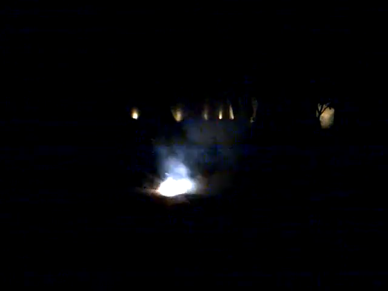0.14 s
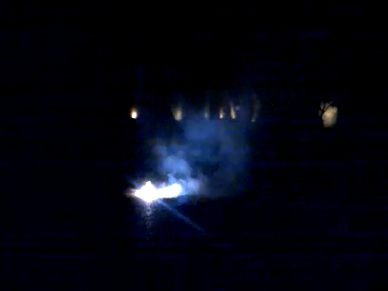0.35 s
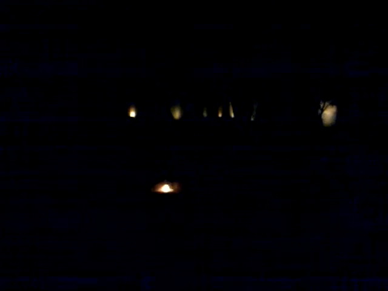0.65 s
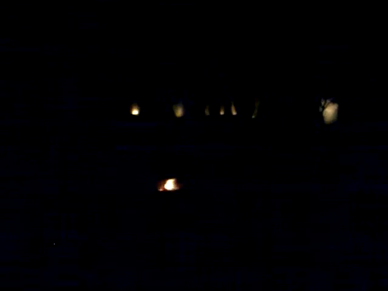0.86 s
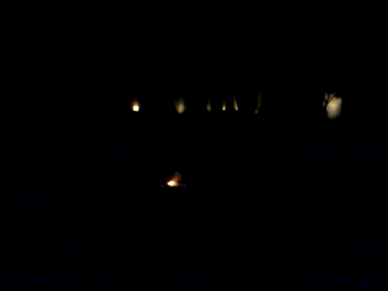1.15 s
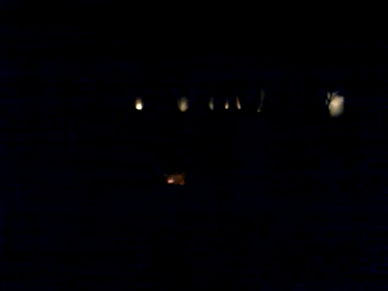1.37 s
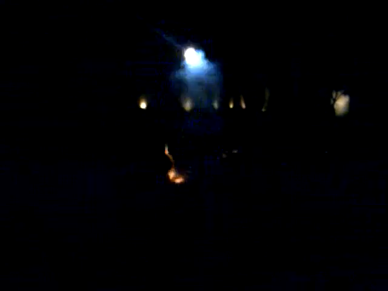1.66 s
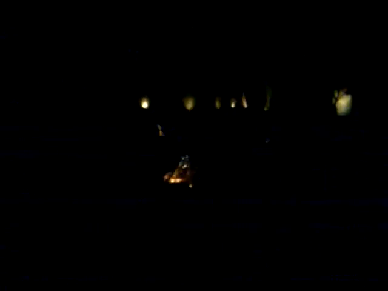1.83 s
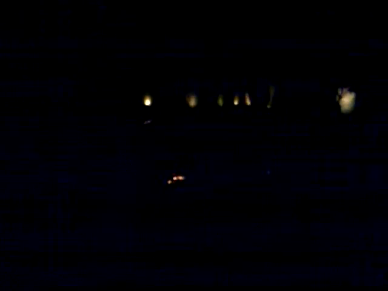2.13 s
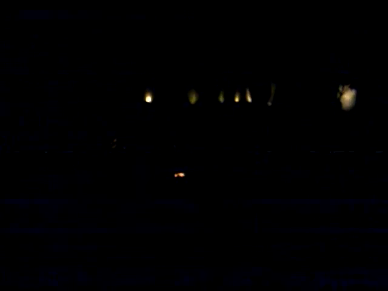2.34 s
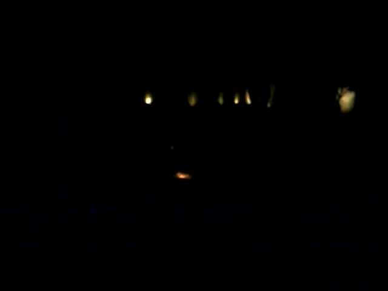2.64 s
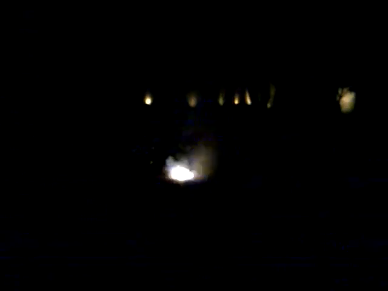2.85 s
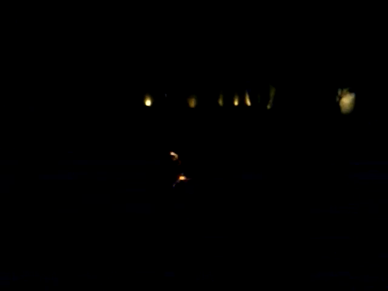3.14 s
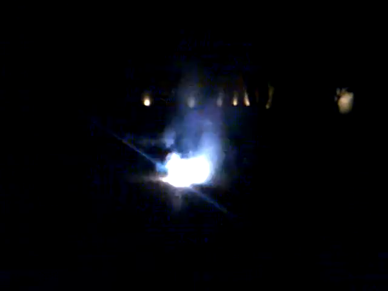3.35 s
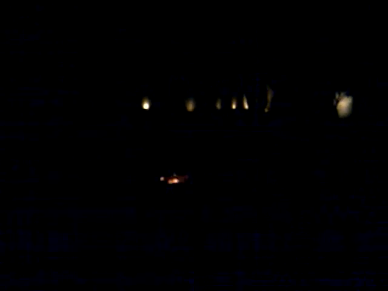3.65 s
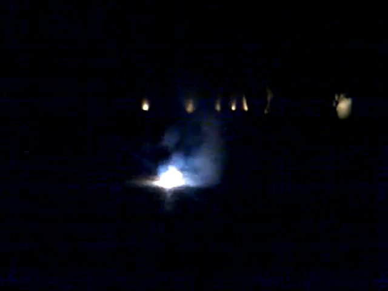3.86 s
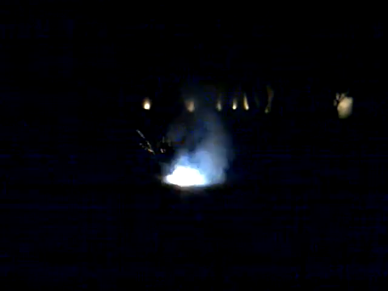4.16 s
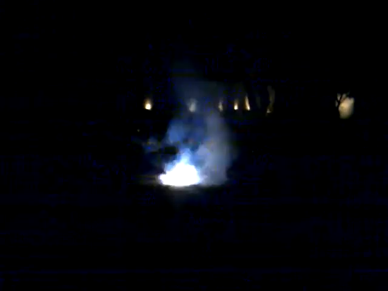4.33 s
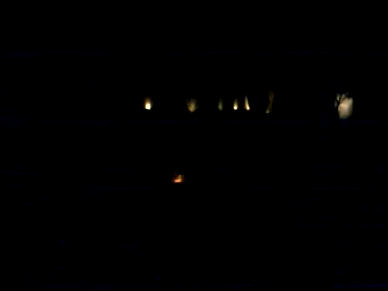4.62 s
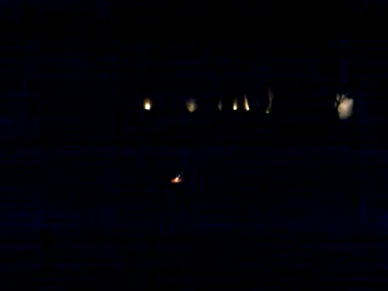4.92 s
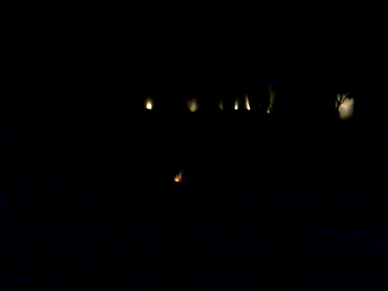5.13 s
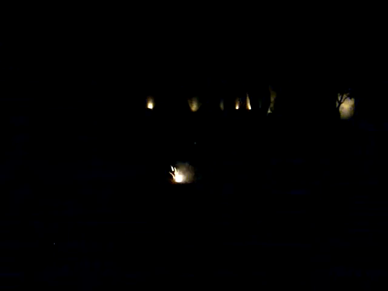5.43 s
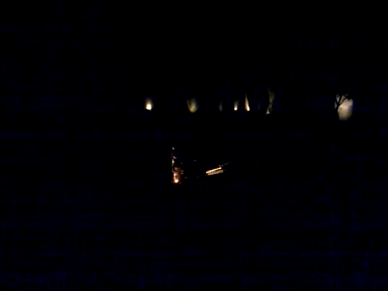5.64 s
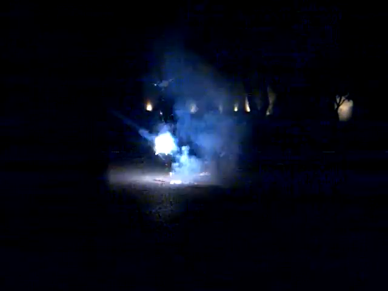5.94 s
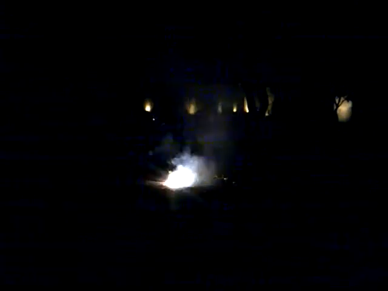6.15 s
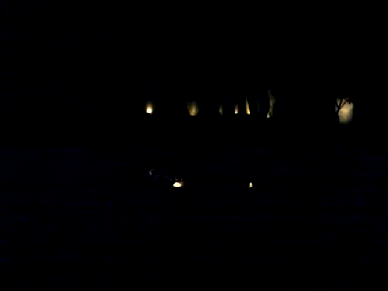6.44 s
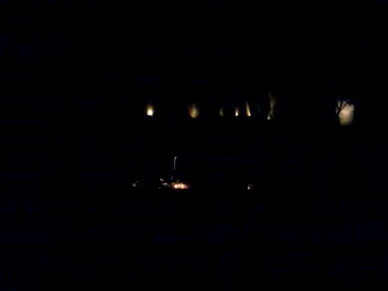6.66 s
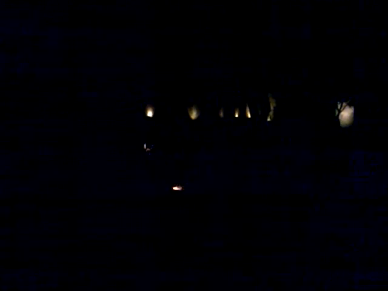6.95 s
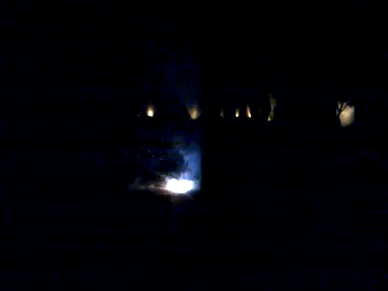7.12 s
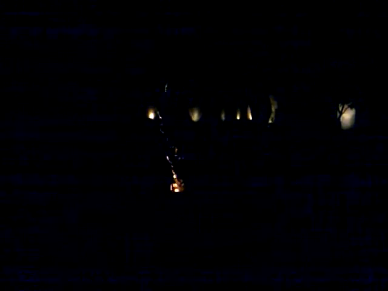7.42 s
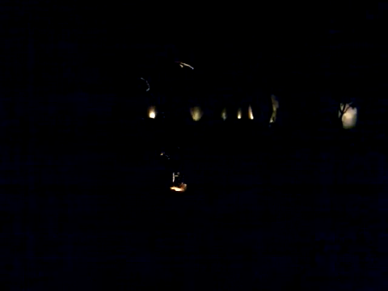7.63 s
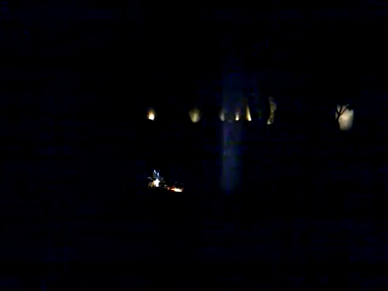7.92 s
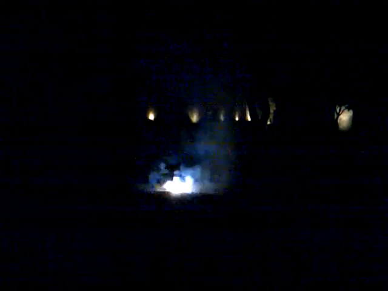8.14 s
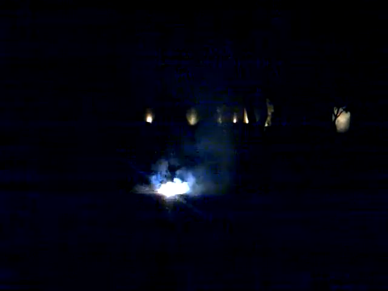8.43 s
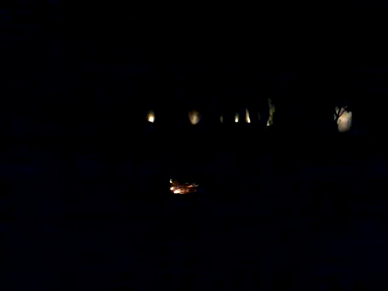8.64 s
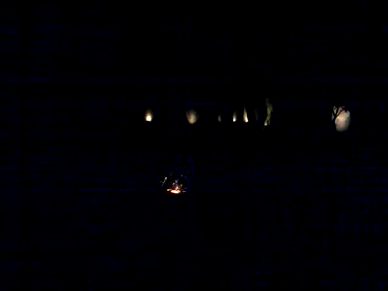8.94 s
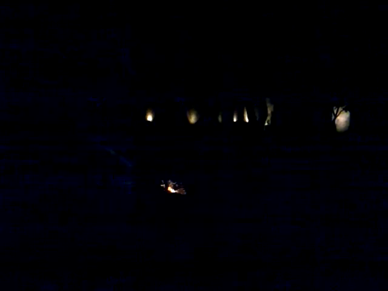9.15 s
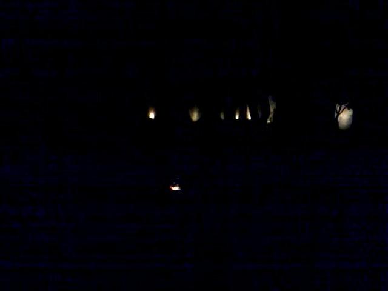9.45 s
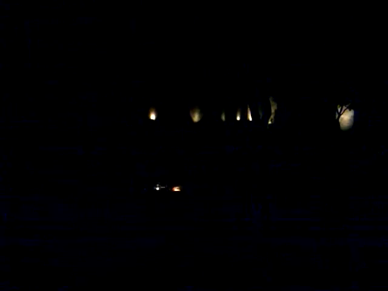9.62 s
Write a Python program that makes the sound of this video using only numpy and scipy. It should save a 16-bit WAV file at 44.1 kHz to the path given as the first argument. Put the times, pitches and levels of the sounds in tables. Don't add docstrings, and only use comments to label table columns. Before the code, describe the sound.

Dense, uneven firecracker bangs crack close by outdoors, distorting the small microphone, while house fronts throw back rough, pumping echoes without a pause

```python
import sys
import numpy as np
from scipy import signal
from scipy.fft import rfft, irfft, next_fast_len
from scipy.io import wavfile
from scipy.ndimage import uniform_filter1d

SR = 44100
rng = np.random.default_rng(int(sys.argv[2]) if len(sys.argv) > 2 else 0)


def gain_from_db(level_db):
    decades = np.asarray(level_db, float) / 20
    return 10 ** decades


def dump_mix(stems):
    frames = np.atleast_2d(stems).T
    limited = np.clip(frames, -1, 1)
    pcm = np.round(limited * 32767).astype(np.int16)
    wavfile.write(sys.argv[1], SR, pcm)


N = 431298
LEAD = SR // 4

# t/s, peak level/dB, treble level/dB, bass level/dB, charge level/dB
EARLIER_BANGS = [
    (-.2, -6, -12.5, -15, -2),
    (-.1, -6, -7, -10, -4.5),
    (-.002, -16, -30, -18.5, -3.5),
]
# delay t/s, level over the scatter/dB, pitch reflected best f/Hz
WALLS = [(0.012, 8.5, 700), (0.0235, 11.5, 2080), (0.028, 9.5, 2500), (0.055, 0.5, 600), (0.062, -3, 1300),
         (0.07, 6.5, 400), (0.072, 4.5, 4200), (0.0735, 8.5, 900), (0.087, 3.5, 1100), (0.098, 0.5, 600),
         (0.107, 7.5, 2085), (0.11, 6.5, 400), (0.125, 7, 2085), (0.134, 11.5, 350), (0.14, 7, 130),
         (0.152, 5.5, 2900), (0.165, 0.5, 130.5), (0.168, 4.5, 1096), (0.177, -1.5, 129),
         (0.195, 5.5, 2100), (0.218, 7.5, 1100), (0.24, -0.5, 2100), (0.276, 3, 960)]
WALL_OCTAVES = 1.1
# first level/dB, top t/s, top level/dB, fall/(dB per s)
SCATTER = [
    (-12.5, .151, -.8, 48.5),
    (5.5, 0.12, -3, 49),
    (-2.7, 0.1, 3, 53.5),
    (-11, 0.15, 3.5, 52.5),
    (0.2, 0.057, 3.5, 51.5),
]
BANDS_HZ = (130, 390, 960, 2100, 4200)
SIDE_STREET_S, SIDE_STREET_WIDTH_S, SIDE_STREET_DB = .043, 0.0052, -6.5
# f/Hz, level/dB
STREET_COLOUR = [(20, -41), (40, -27), (296, -4.5), (453, -10.5), (580, -6.5), (1220, 0.5), (2440, -10.5),
                 (2950, -16), (3900, -15), (4550, -18), (4950, -23), (6420, -27.5), (6870, -36.5),
                 (8600, -85)]
# start t/s, length t/s, level/dB
FLUTTER_SWELLS = [
    (0.004, .125, -15.5),
    (0.174, 0.067, -21),
    (0.335, .1, -21.5),
    (0.504, 0.088, -23),
    (0.628, 0.065, -24),
]
FLUTTER_HZ, FLUTTER_WIDTH_HZ = 1194, 120
FLUTTER_RISE_S, FLUTTER_FADE_DB = .008, -6.5
# f/Hz, level/dB
BLAST_COLOUR = [(35, -38.5), (60, -6), (893, -0.5), (2630, -6), (3520, -5.5), (6700, -15), (7440, -17.5),
                (8600, -48), (11200, -66.5), (18900, -120)]
# t/s, peak level/dB, treble level/dB, charge level/dB
CRACKS = [(0.117, 0, -19, -2), (0.299, -3, -22.5, -1.5), (0.691, -6, -17, -3.3), (1.196, -4.5, -19, -10),
          (1.856, -13, -15.5, 1.6), (1.894, -2, -26, 0), (2.017, -8, -13.5, 4.5), (2.049, -8, -22, 6),
          (2.208, 0.5, -27, -1.4), (2.859, -0.5, -18.5, -2.2), (3.045, -3, -23, 7),
          (3.651, -1.5, -18.5, -4), (3.923, -3.5, -20, 1.5), (4.638, 3.5, -31, 3.5), (4.71, -8.5, -17, 0.5),
          (5.151, -8, -19, 5), (5.886, -4, -22.5, -1.5), (6.133, -4.5, -17, -0.7), (6.884, -3.5, -21, 6),
          (7.279, -2, -18, 4.7), (7.374, -2.5, -24, 17), (7.961, -14.5, -10, -14.5),
          (8.03, -1, -21.5, -7.5), (8.796, -3.5, -49, 0.5), (9.715, -5.5, -15, 5.5)]
CRACK_BASS_DB = -28.5
# t/s, bass level/dB, charge heard in echoes level/dB, splatter level/dB
SLAMS = [(0.267, -27, -2, -45), (0.445, -30.5, -3.5, -55.5), (0.927, -20, -3, -41.5),
         (1.321, -17.5, -12.5, -56.5), (1.63, -15.5, 0, -36.5), (1.814, -15, 2, -53.5),
         (2.31, -35, -1.5, -28.5), (2.549, -21, 6.5, -43), (3.141, -18, 13.5, -44),
         (3.479, -25, -0.3, -28.5), (3.868, -47, -3.5, -58.5), (4.206, -15, -0.1, -39.5),
         (5.012, -23, 4, -38), (5.131, -40, 2, -44), (5.407, -17, 3.5, -35), (5.673, -23, -5, -37),
         (5.845, -24, -1.3, -38.5), (6.021, -13, -5.5, -38.5), (6.464, -23, 0.5, -64.5),
         (6.662, -35, 5, -49.5), (7.142, -20.5, 2.5, -32), (7.691, -25.5, 2.5, -46.5),
         (7.944, -20, -4.5, -40), (8.275, -26, -5, -46.5), (8.562, -33, -9.5, -30), (9.628, -21.5, 0, -43)]
SLAM_PEAK_DB, SLAM_TREBLE_DB = -1, -20
# t/s, peak level/dB, bass level/dB, charge level/dB
THUDS = [(0.567, -1.5, -21, -7.5), (1.414, -0.5, -22, -9.5), (1.453, -6.5, -13, -7.5),
         (1.835, -3.5, -24, -3), (1.933, -10, -14, 3), (2.029, -4, -17, -5), (2.344, -5.5, -16.5, 0),
         (2.62, 0.5, -19, 7.5), (2.924, -9, -3.5, 1.5), (2.977, -3.5, -18.5, 6), (3.995, -4, -20, 5),
         (4.231, -7.5, -15, 1), (4.283, -4.5, -27, 4.5), (4.473, -2, -22, 0), (4.694, -5, -22.5, -0.8),
         (6.037, -12, -7, -4.5), (6.245, -3.5, -21, 0.5), (6.291, -8.5, -17, 1), (6.767, -4, -19, 4.5),
         (6.838, -10.5, 2.5, 5), (8.611, -4.5, -14, -11.0), (8.69, -6, -13, -10.5), (9.023, -2.5, -17, -2),
         (9.192, 0, -23, 5), (9.288, -7, -6.5, 5)]
THUD_TREBLE_DB, DULLING = -21.5, .7
# t/s, peak level/dB, treble
# level/dB, bass level/dB
SHARP_ECHOES = [(0.506, -4, -23, -20), (0.758, -11, -24, -28), (0.998, -3, -27, -24), (1.051, 0, -33, -33),
                (2.815, 0, -38, -35), (2.839, -4, -34, -35), (3.337, -9, -25, -31), (4.189, -4, -16, -21),
                (4.277, 0, -20, -29), (4.356, -15, -30, -29), (4.902, -4, -31, -15), (4.911, -1, -31, -4),
                (5.78, -1, -25, -24), (6.238, -5, -19, -26), (6.655, -4, -24, -27), (7.075, -6, -28, -32),
                (7.099, -3, -32, -27), (7.796, -5, -22, -13), (7.82, -2.5, -30, -15), (7.908, -6, -16, -35),
                (8.221, -5, -27, -32), (8.244, -4, -18, -19), (8.465, -7, -32, -34), (9.502, 0, -25, -28)]
# start t/s, end t/s, step level/dB, slide/(dB per s)
DROPOUTS = [
    (2.2142, 2.303, -24, -3600),
    (2.303, 2.3112, -46, 900),
    (3.6572, 3.6762, -16, -200),
]


def read(points, hz):
    f, value = np.transpose(points)
    return np.interp(np.log(hz + 1), np.log(f + 1), value)


def colour(x, points, size=3000):
    hz = abs(np.fft.fftfreq(8192, 1 / SR))
    log_gain = np.log(gain_from_db(np.maximum(read(points, hz), -100)))
    spectrum = np.exp(np.conj(signal.hilbert(log_gain)))
    taps = np.fft.ifft(spectrum).real[:size] * np.hanning(2 * size)[size:]
    return signal.oaconvolve(x, taps)[..., :x.shape[-1]]


def mixed(bands, edges_hz=(250, 600, 1550, 2800)):
    length = bands.shape[1]
    size = next_fast_len(length)
    hz = np.fft.rfftfreq(size, 1 / SR)
    below = [1 / (1 + (hz / edge) ** 6) for edge in edges_hz]
    power_shares = np.diff([0 * hz, *below, 0 * hz + 1], axis=0)
    shares = np.sqrt(np.maximum(power_shares, 0))
    return irfft((rfft(bands, size) * shares).sum(0), size)[:length]


def add(mix, s, sound):
    part = mix[:, LEAD + round(s * SR):][:, :sound.shape[1]]
    part += sound[:, :part.shape[1]]


def bangs():
    slams = [(s, SLAM_PEAK_DB, SLAM_TREBLE_DB, bass_db, charge_db) for s, bass_db, charge_db, _ in SLAMS]
    thuds = [(s, db, THUD_TREBLE_DB - DULLING * db, bass_db, charge_db)
             for s, db, bass_db, charge_db in THUDS]
    cracks = [(s, db, treble_db, CRACK_BASS_DB, charge_db) for s, db, treble_db, charge_db in CRACKS]
    return sorted(EARLIER_BANGS + slams + thuds + cracks)


def tone(treble_db, bass_db):
    return np.array([[bass_db + 25.0], [0.12 * (bass_db + 22.5)], [0], [0], [treble_db + 19.5]])


def street(chance, spread_db=1.0, grain_db=1.12, patchy_db=3.0, smear_s=0.0014):
    places, signs, sizes = chance[0], chance[1:6], chance[6:]
    at = np.arange(len(places)) * 10 + (places * 10).astype(int)
    t = at / SR

    first_db, top_s, top_db, fall_db = np.transpose(SCATTER)[..., None]
    rise_db = (first_db - top_db) * np.maximum(1 - t / top_s, 0)
    shape_db = top_db + rise_db - fall_db * np.maximum(t - top_s, 0)
    shape_db = shape_db + SIDE_STREET_DB * np.exp(-((t - SIDE_STREET_S) / SIDE_STREET_WIDTH_S) ** 2)
    clumpy_db = patchy_db * 27 * (uniform_filter1d(sizes[:, ::-1], size=60) - .5)
    power = gain_from_db(2 * (shape_db + clumpy_db)) * (t > .004)

    delay, db, hz = np.transpose(WALLS)
    octaves_off = np.log2(np.outer(BANDS_HZ, 1 / hz))
    levels = db * np.exp(-(octaves_off / WALL_OCTAVES) ** 2)
    count = len(delay)
    moved = delay + .0012 + .001 * (places[-count:] - .5)
    clumps = np.exp(-((t[:1300] - moved[:, None]) / smear_s) ** 2)
    wall_db = levels * 1.35 + spread_db * 4 * (sizes[:, -count:] - .5)
    power[:, :1300] *= 1 + np.maximum(gain_from_db(2 * wall_db) - 1, 0) @ clumps

    grains = gain_from_db(-grain_db * np.log(sizes + 0.00033))
    taps = np.zeros((5, len(places) * 10))
    taps[:, at] = np.sign(signs - .5) * grains * np.sqrt(power)
    return taps


def echoes(thump=.15):
    rows = bangs()
    bands = np.zeros((5, N + LEAD))
    for (s, _, treble_db, bass_db, charge_db), chance in zip(rows, rng.random((len(rows), 11, 3000))):
        level_db = charge_db - 32 + thump * tone(treble_db, bass_db)
        add(bands, s, gain_from_db(level_db) * street(chance))
    return colour(mixed(bands), STREET_COLOUR)[LEAD:]


def gain_control(react_s=0.0032, rest_db=9.5, share=0.94, forget_db=271, recover_db=-15.5,
                 dip_db=11.0, dip_s=0.092):
    s, *_, charge_db = np.transpose(bangs())
    age = s[:, None] - s
    remembered = (age >= 0) * gain_from_db(2 * (charge_db - forget_db * abs(age)))
    held_db = rest_db - share * 10 * np.log10(remembered.sum(1))
    t = np.arange(N) / SR
    last = np.maximum(np.searchsorted(s + react_s, t) - 1, 0)
    since = t - s[last] - react_s
    gain_db = held_db[last] + recover_db * since - dip_db * np.exp(-since / dip_s)
    return gain_from_db(uniform_filter1d(gain_db, size=30))


def flutter():
    t = np.arange(N) / SR
    b, a = signal.iirpeak(FLUTTER_HZ, FLUTTER_HZ / FLUTTER_WIDTH_HZ, SR)
    once = signal.lfilter(b, a, rng.standard_normal(N))
    hum = signal.lfilter(b, a, once)
    swells = np.zeros(N)
    for s, length, db in FLUTTER_SWELLS:
        ramps = np.clip(np.minimum(t - s, s + length - t) / FLUTTER_RISE_S, 0, 1)
        swells += ramps * gain_from_db(db + FLUTTER_FADE_DB * np.clip((t - s) / length, 0, 1))
    return hum / hum.std() * swells


def burst(chance, length_s=0.00436, fade_db=(1.5, 1.5, 3, 7, 13), shock=5):
    u = np.arange(len(chance)) / (length_s * SR)
    wave = chance * abs(chance) / (1 + np.exp(np.minimum(40 * (u - 1), 50)))
    wave[:24] *= .5
    wave[[0, 11, 24]] += -shock, 1.5 * shock, -.7 * shock
    return wave * gain_from_db(-np.outer(fade_db, u)) / np.linalg.norm(wave)


def blasts(rise_s=0.001613):
    rows = bangs()
    bands = np.zeros((5, N + LEAD))
    for (s, peak_db, treble_db, bass_db, _), chance in zip(rows, rng.standard_normal((len(rows), 300))):
        add(bands, s + rise_s, burst(chance) * gain_from_db(peak_db + tone(treble_db, bass_db)))
    return colour(mixed(bands), BLAST_COLOUR, size=260)[LEAD:]


def sharp_echoes(rise_s=0.001613, length_s=0.0012):
    bands = np.zeros((5, N + LEAD))
    for (s, peak_db, treble_db, bass_db), chance in zip(SHARP_ECHOES, rng.standard_normal((len(SHARP_ECHOES), 300))):
        level_db = peak_db - 6 + tone(treble_db - 17, bass_db - 15.0)
        add(bands, s + rise_s, burst(chance, length_s) * gain_from_db(level_db))
    return colour(mixed(bands), BLAST_COLOUR, size=260)[LEAD:]


def scene():
    reflected = gain_from_db(25.5) * gain_control() * echoes()
    hum = flutter()
    direct = gain_from_db(24.5) * (blasts() + sharp_echoes())
    return (direct + reflected + hum)[None]


def overload(x):
    return x / (1 + (x / .68) ** 4) ** .25


def splatter():
    ticks = np.zeros(N)
    s, *_, tick_db = np.transpose(SLAMS)
    ticks[((s + .002) * SR).astype(int)] = gain_from_db(tick_db + 10)
    return ticks


def dropouts():
    t, loss_db = np.arange(N) / SR, np.zeros(N)
    for start, end, step_db, slide_db in DROPOUTS:
        loss_db += ((t > start) & (t <= end)) * (step_db + slide_db * (t - start))
    return gain_from_db(uniform_filter1d(loss_db, size=20))


def band_limit(x):
    return signal.sosfilt(signal.butter(12, 16000, fs=SR, output="sos"), x)


def record(dry):
    squeezed = overload(dry) * dropouts()
    lowpass = signal.firwin(71, 8200, window=("kaiser", 9), fs=SR)
    limited = signal.oaconvolve(squeezed, lowpass[None], "same")
    return band_limit(np.clip(limited, -.72, .72) + splatter())


dry = scene()
out = record(dry)
dump_mix(out)
```